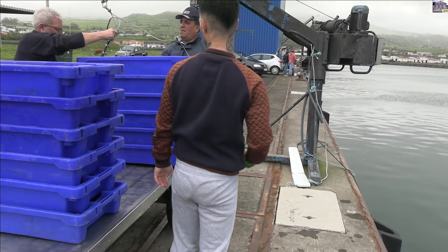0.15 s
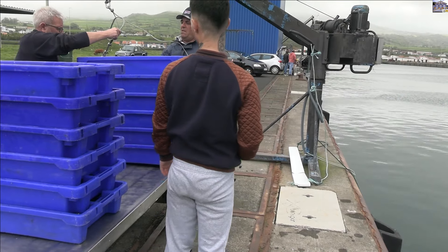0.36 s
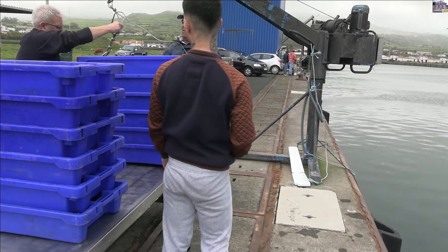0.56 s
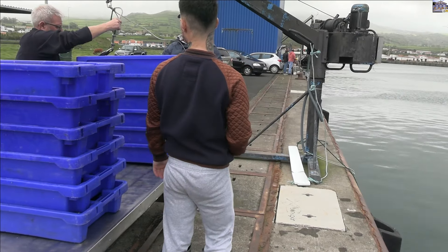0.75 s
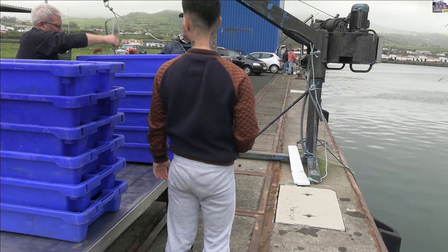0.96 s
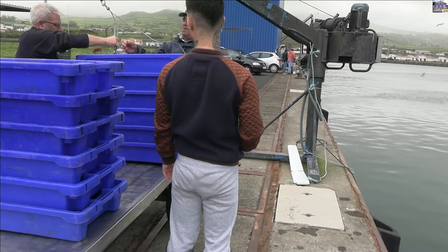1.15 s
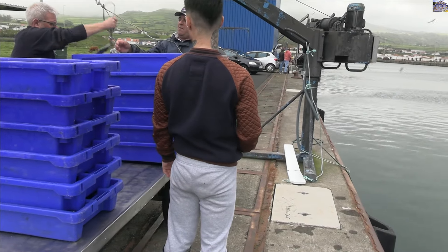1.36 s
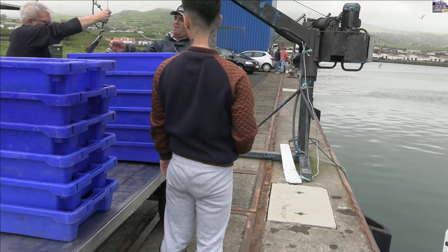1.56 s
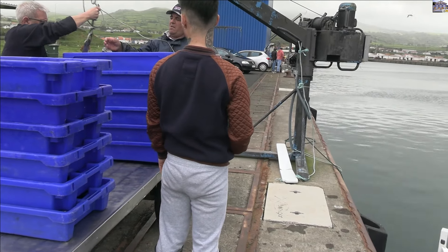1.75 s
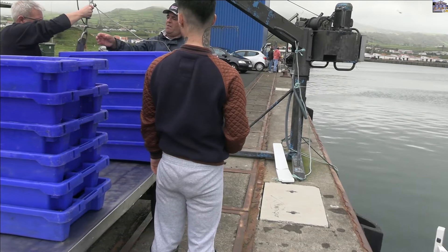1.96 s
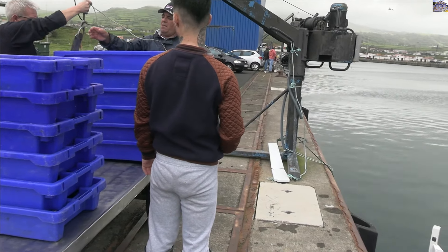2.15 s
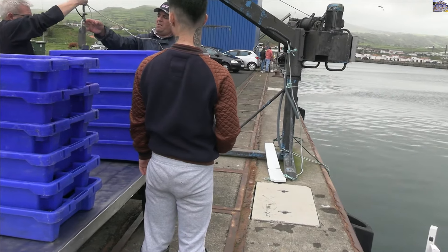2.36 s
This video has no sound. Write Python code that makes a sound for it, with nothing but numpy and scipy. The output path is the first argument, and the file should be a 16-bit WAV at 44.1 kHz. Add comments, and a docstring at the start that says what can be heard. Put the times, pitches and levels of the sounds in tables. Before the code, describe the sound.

An electric hoist whines steadily as a heavy plastic crate thuds down and metal clinks.

```python
"""On a harbour quay, a small crane's electric hoist runs steadily: a whine of motor overtones and gear
tones over a low throb that shakes the housing. A heavy plastic crate thuds down once, its floor booming,
and the steel hook and shackle clink; lighter hollow knocks come before and after. Behind it lie a wash
of harbour noise and one chirp from a small bird, and a breeze nudges the microphone."""
import sys
import numpy as np
from scipy.fft import rfft, irfft, next_fast_len
from scipy.io import wavfile
from scipy.ndimage import uniform_filter1d, minimum_filter1d, map_coordinates

SR = 44100
rng = np.random.default_rng(int(sys.argv[2]) if len(sys.argv) > 2 else 0)


def store_pcm(level_fs):
    """Save levels as 16-bit WAV."""
    pcm = np.round(np.clip(level_fs, -1, 1) * 32767).astype(np.int16)
    wavfile.write(sys.argv[1], SR, np.atleast_2d(pcm).T)


N = 110250
T = np.arange(N) / SR


def amp(db):
    """Decibels to gain."""
    return 10 ** (np.asarray(db) / 20)


def unit(x):
    """Scaled to rms 1."""
    return x / np.sqrt(np.mean(x ** 2) + 1e-20)


def along(points, hz):
    """Read an EQ curve at hz, on a log frequency axis."""
    freqs, levels = np.transpose(points)
    return np.interp(np.log(hz + 1), np.log(freqs + 1), levels)


def wobble(rate):
    """Smooth random modulation, rate knots a second."""
    return map_coordinates(rng.standard_normal(int(N * rate / SR) + 4), [T * rate], mode="nearest")


def filtered(x, response):
    """Shape x with a frequency response."""
    size = next_fast_len(N + SR // 2)
    return irfft(rfft(x, size) * response(np.fft.rfftfreq(size, 1 / SR)), size)[..., :N]


def noise(eq):
    """Noise coloured by an EQ curve, at rms 1."""
    return unit(filtered(rng.standard_normal(N), lambda hz: amp(along(eq, hz))))


def turning(hz):
    """Phase of something that turns at hz."""
    return 2 * np.pi * np.cumsum(hz) / SR


def tone(phase, db):
    """A sine at an rms level, with a random starting phase."""
    return np.sqrt(2) * amp(db) * np.sin(phase + rng.uniform(0, 2 * np.pi))


def since(start_s):
    """Time since start_s, zero before."""
    return np.maximum(T - start_s, 0)


def ring(modes, t, tilt_db, pivot_hz):
    """Decaying modes, tilted by tilt_db an octave and balanced a little differently at each blow."""
    return sum(amp(db + tilt_db * np.log2(hz / pivot_hz) + rng.normal(0, 1) - 60 * t / t60)
               * np.sin(2 * np.pi * hz * t) for hz, db, t60 in modes)


def blows(hits, modes, eq, ring_db, rattle_db, rattle_t60_s, attack_s, pivot_hz):
    """Each contact rings the body's modes and raises a short rattle, with its own brightness."""
    out = np.zeros(N + SR)
    t = np.arange(SR // 2) / SR
    attack = 1 - np.exp(-t / attack_s)
    for start_s, db, tilt_db in hits:
        colour = [(hz, level + tilt_db * np.clip(np.log2(hz / pivot_hz), -2, 2)) for hz, level in eq]
        rattle = noise(colour)[:len(t)] * amp(rattle_db - 60 * t / rattle_t60_s)
        body = amp(ring_db) * ring(modes, t, tilt_db, pivot_hz)
        out[round(start_s * SR):][:len(t)] += amp(db) * attack * (body + rattle)
    return out[:N]


# Dark harbour bed: freq_hz, gain_db
HARBOUR_EQ = [(25, 2), (45, -10.5), (130, 3), (240, -5.5), (430, -9.5), (640, -14), (800, -10), (1350, -17),
              (1900, -21.5), (2500, -24.5), (4500, -32), (5200, -33), (6900, -41.5), (8700, -41),
              (12000, -50.5), (15500, -60)]
HARBOUR_DB = -35

def harbour():
    """A wash of harbour noise whose level wavers slightly."""
    return noise(HARBOUR_EQ) * amp(HARBOUR_DB + 0.49 * wobble(7.25))


# Sub-bass wind rumble: freq_hz, gain_db
BREEZE_EQ = [(3, -12), (9, 0), (16, 6.5), (28, -48.5), (45, -11), (120, -36), (400, -100)]
# Pushes of air: centre_s, level_db, half_width_s
PUFFS = [(1.661, -12.5, 0.032), (2.363, -18, 0.015)]
BREEZE_DB = -29

def breeze():
    """Air buffets the microphone slowly, with two stronger pushes."""
    pushes = np.zeros(N)
    for centre_s, db, half_width_s in PUFFS:
        offset = (T - centre_s) / half_width_s
        pushes += amp(db) * (1 - 2 * offset ** 2) * np.exp(-offset ** 2)
    return amp(BREEZE_DB) * noise(BREEZE_EQ) + pushes


# Contour of the chirp: time_s, pitch_hz, level_db
CHIRP_CONTOUR = [(.53, 3300, -62), (.537, 4480, -44), (.544, 5140, -43.5), (.553, 5130, -43.5),
                 (.562, 3760, -46), (0.583, 3200, -59), (.595, 3450, -44), (.608, 3300, -75)]

def bird():
    """One thin chirp arches up and down with a fast quiver in pitch."""
    times, pitches, levels = np.transpose(CHIRP_CONTOUR)
    pitch_hz = np.interp(T, times, pitches) * (1 + 0.024 * wobble(400))
    gate = (T > times[0]) * (T < times[-1])
    return tone(turning(pitch_hz), np.interp(T, times, levels)) * gate


# Partials of the low beat: multiple, level_db
THROB_ORDERS = [(1, -30.5), (1.5, -44.5), (2, -38), (3, -43), (4, -52.5), (5.5, -49)]
# Resonances of the hoist housing: centre_hz, width_hz, gain_db
HOUSING_MODES = [(177.8, 28, 4.5), (302.3, 11.3, -5), (338, 72, -12), (542, 12, -35.5), (913, 32, -11),
                 (1069, 79, -12.5), (1710, 200, -14), (1980, 40, -29)]
# Upper-mid clatter: freq_hz, gain_db
CLATTER_EQ = [(800, -44), (1500, -6.5), (2000, 8.5), (2600, -7.5), (5000, -20), (9000, -46), (15000, -55)]
THROB_HZ, HOUSING_DB, CLATTER_DB = 54.62, -38.5, -53

def housing_response(hz):
    """The housing resonates in several bands and rolls off the treble."""
    bands = sum(amp(db) * 1j * hz * width / (centre ** 2 - hz ** 2 + 1j * hz * width)
                for centre, width, db in HOUSING_MODES)
    return bands / (1 + (hz / 3200) ** 4)


def throb(drift=0.0054, sway_db=1.5, shake_depth=0.43, sharpness=2.4, scatter_db=1.5):
    """The machine's low beat; every beat also shakes the housing and clatters."""
    phase = turning(THROB_HZ * (1 + drift * wobble(10)))
    beat = sum(np.sqrt(2) * amp(db - sway_db * wobble(7.1)) * np.cos(order * phase)
               for order, db in THROB_ORDERS)
    shake = rng.standard_normal(N) * (1 + shake_depth * np.cos(phase))
    housing = unit(filtered(shake, housing_response))
    pulses = np.exp(sharpness * np.cos(phase))
    clatter = unit(noise(CLATTER_EQ) * pulses * amp(scatter_db * wobble(THROB_HZ)))
    return beat + amp(HOUSING_DB) * housing + amp(CLATTER_DB) * clatter


# The motor's strong overtones: multiple, level_db
STRONG_ORDERS = [(2, -51), (4, -45.5), (5, -59), (6, -55), (7, -57), (8, -58), (12, -69.5), (14, -64.5),
                 (20, -72)]
# Level curve of its faint upper overtones: freq_hz, level_db
FAINT_ORDER_CURVE = [(2400, -70), (4500, -75), (5800, -74), (7400, -84), (10000, -85), (11700, -86),
                     (12500, -93), (13900, -92), (15500, -104)]
# Gear and bearing tones: pitch_hz, level_db
GEAR_TONES = [(713.2, -44.5), (802.3, -44.5), (903, -75.5), (2584, -65), (2734, -62), (4100, -71),
              (6590, -82)]
WHINE_HZ = 273.45

def whine(drift=0.000396, jitter_rad=0.004, scatter_db=1.5, flutter_db=1):
    """The motor's overtones and gear tones all follow one nearly steady shaft speed."""
    speed = 1 + drift * wobble(14)
    # Fast shaft jitter roughens the high overtones.
    phase = turning(WHINE_HZ * speed) + jitter_rad * wobble(120)
    levels = {order: along(FAINT_ORDER_CURVE, order * WHINE_HZ) + scatter_db * rng.normal()
              for order in range(9, 58)}
    levels.update(STRONG_ORDERS)
    motor = sum(tone(order * phase, db + flutter_db * wobble(24.5)) for order, db in levels.items())
    gears = sum(tone(turning(hz * speed), db + 1.94 * wobble(17)) for hz, db in GEAR_TONES)
    return motor + gears


# Light knocks: start_s, level_db, tilt_db_per_octave
KNOCK_HITS = [(.044, -27, -1.5), (.2125, -30, 2), (.535, -29.5, -8), (.756, -24.5, 1.5),
              (.761, -27.5, -5.5), (.784, -32, -5), (1.385, -32, -2), (1.538, -26.5, 2), (1.547, -24, -4.5),
              (1.574, -30, -2), (1.999, -16.5, -3.5), (2.016, -28, -3)]
# Ring of the hollow body: pitch_hz, gain_db, t60_s
HOLLOW_MODES = [(325, -4, .09), (375, -1, .12), (470, -7, .07), (587, -1, .1), (905, -2, .1),
                (1045, -4, .08), (1320, -12, .07), (1705, -9, .08), (2100, -18, .05)]
# Midrange rattle of a knock: freq_hz, gain_db
KNOCK_EQ = [(120, -17), (350, 2), (1000, -0.5), (1900, -6), (3000, -20), (6000, -33.5), (15000, -56)]

def knocks():
    """Light blows briefly ring a hollow body."""
    return blows(KNOCK_HITS, HOLLOW_MODES, KNOCK_EQ, ring_db=-3.5, rattle_db=0.5,
                 rattle_t60_s=0.077, attack_s=0.00059, pivot_hz=720)


# Contact tick on steel: freq_hz, gain_db
CONTACT_EQ = [(1000, 0), (3000, -3), (9000, -19), (15000, -16)]

def clinks(hits, modes, jangle_rad=0.55, jangle_hz=300, tick_db=-1.5, tick_t60_s=0.079):
    """Struck steel ticks and rings; the loose part rattles, scattering the phase of its ring."""
    out = np.zeros(N)
    for start_s, db in hits:
        t = since(start_s)
        jangle = sum(amp(level - 60 * t / t60)
                     * np.sin(2 * np.pi * hz * t + jangle_rad * wobble(jangle_hz))
                     for hz, level, t60 in modes)
        tick = noise(CONTACT_EQ) * amp(tick_db - 60 * t / tick_t60_s)
        out += amp(db) * (T > start_s) * (jangle + tick)
    return out


# Bright ring of the two steel parts: pitch_hz, gain_db, t60_s
HOOK_MODES = [(3400, -12, .25), (4230, 6, 0.32), (5460, 2.5, 0.26), (6540, 1, 0.35), (6800, -5, 0.4),
              (7650, -14, .2), (8140, -0.5, 0.45), (9275, -10, 0.22), (13140, -19, .2)]
SHACKLE_MODES = [(1800, -13, .06), (3400, -18, .15), (6799, -18, .14), (8016, -13, .13), (8301, 0, .12),
                 (8750, -7, .04), (9275, -13, .1), (11290, -21, .13), (13630, -31, .2), (15060, -36, .12)]
# Cues for the clinks and dry ticks: start_s, level_db
HOOK_HITS = [(1.005, -51), (1.065, -44), (1.435, -59.5)]
SHACKLE_HITS = [(1.1105, -26), (1.161, -55)]
DRY_TICKS = [(1.003, -32.5), (1.028, -49), (1.065, -51), (1.161, -41.5), (1.44, -49)]
# Colour of the dry ticks and the airy brush: freq_hz, gain_db
DRY_TICK_EQ = [(1500, -6), (4200, 0), (6000, -7), (8500, -6), (12000, -13), (15500, -25)]
BRUSH_EQ = [(2000, -20), (6000, 1), (9500, -4), (12000, -14), (15500, -20)]

def tackle(brush_db=-57.5, brush_at_s=0.89, brush_half_width_s=0.037, tick_t60_s=0.077):
    """A soft brush, then hook and shackle clink among dry ticks."""
    brush = amp(brush_db) * np.exp(-((T - brush_at_s) / brush_half_width_s) ** 2) * noise(BRUSH_EQ)
    ticks = sum((T > start_s) * amp(db - 60 * since(start_s) / tick_t60_s) * noise(DRY_TICK_EQ)
                for start_s, db in DRY_TICKS)
    return brush + ticks + clinks(HOOK_HITS, HOOK_MODES) + clinks(SHACKLE_HITS, SHACKLE_MODES)


# Deep booms of the crate's floor: start_s, pitch_hz, level_db, t60_s
FLOOR_BOOMS = [(.992, 76.6, -12, 0.49), (.995, 207, -2.5, 0.21), (1.045, 146.2, -6.5, 0.5)]
# Contacts of the landing: start_s, level_db, tilt_db_per_octave
CRATE_HITS = [(.993, -15, 5), (1.002, -12.5, 1), (1.021, -6, 0), (1.039, -13.5, 3.5), (1.061, -11, 1.5),
              (1.106, -12.5, -4.5)]
# Ring of the crate on its deck: pitch_hz, gain_db, t60_s
CRATE_MODES = [(101, -19, 0.12), (148.8, -6.5, 0.48), (197, -2.5, 0.54), (244.5, -6.5, 0.19),
               (291.2, -5, 0.45), (317, 1, 0.18), (401.4, -0.5, 0.14), (437.3, -7, 0.43), (573, -7.5, 0.33),
               (864, -22, 0.092)]
# Dull rattle of the landing: freq_hz, gain_db
CRATE_EQ = [(50, -14), (100, 2.5), (200, 5.5), (400, -3.5), (700, -10), (1300, -25.5), (2500, -32.5),
            (5000, -50.5), (9000, -51), (15000, -71)]

def crate(boom_attack_s=0.0018):
    """The heavy crate lands and settles in several quick contacts over the boom of its floor."""
    boom = np.zeros(N)
    for start_s, hz, db, t60 in FLOOR_BOOMS:
        t = since(start_s)
        envelope = amp(db - 60 * t / t60) * (1 - np.exp(-t / boom_attack_s))
        boom += envelope * np.sin(2 * np.pi * hz * t)
    return boom + blows(CRATE_HITS, CRATE_MODES, CRATE_EQ, ring_db=-6, rattle_db=-1,
                        rattle_t60_s=0.24, attack_s=0.0011, pivot_hz=250)


def scene():
    """Everything sits in the centre; the breeze and a trace of harbour noise give width."""
    mid = harbour() + breeze() + bird() + throb() + whine() + knocks() + tackle() + crate()
    side = amp(HARBOUR_DB - 48) * noise(HARBOUR_EQ) + amp(BREEZE_DB - 8) * noise(BREEZE_EQ)
    return np.array([mid + side, mid - side])


def record(dry, threshold_db=-17, duck_share=0.35, hold_s=0.19, release_db_per_s=45, top_hz=15750):
    """Gain control ducks on loud sound, holds and recovers; a high cut trims the very top."""
    sidechain = filtered(dry.mean(axis=0), lambda hz: hz > 100)
    power = np.abs(uniform_filter1d(sidechain ** 2, size=882))  # 20 ms window
    level_db = 10 * np.log10(power + 1e-12)
    duck_db = -duck_share * np.maximum(level_db - threshold_db, 0)
    half_hold = int(hold_s * SR / 2)
    held_db = minimum_filter1d(duck_db, 2 * half_hold + 1, origin=half_hold)
    recovery_db = release_db_per_s * T
    gain_db = np.minimum.accumulate(held_db - recovery_db) + recovery_db
    return filtered(dry * amp(gain_db), lambda hz: hz < top_hz)


dry = scene()
out = record(dry)
store_pcm(out)
```